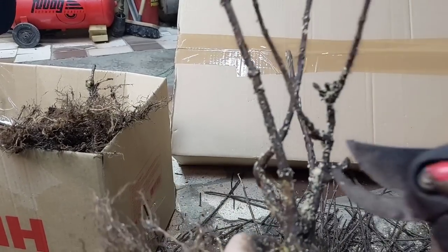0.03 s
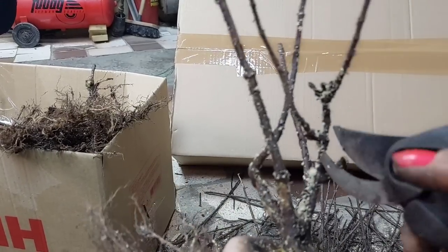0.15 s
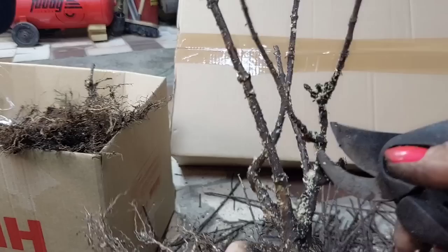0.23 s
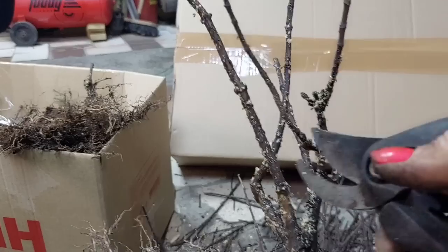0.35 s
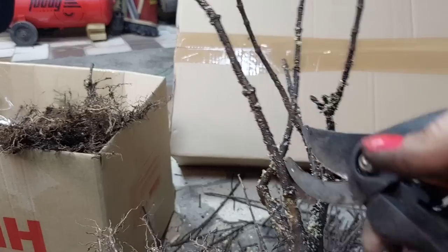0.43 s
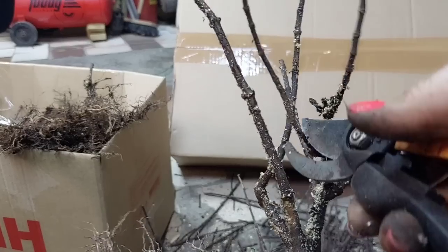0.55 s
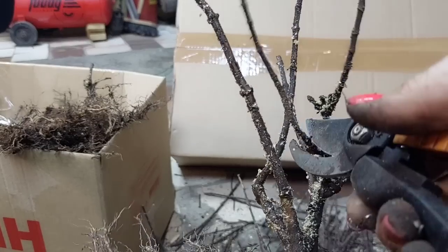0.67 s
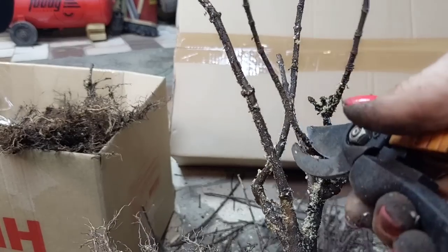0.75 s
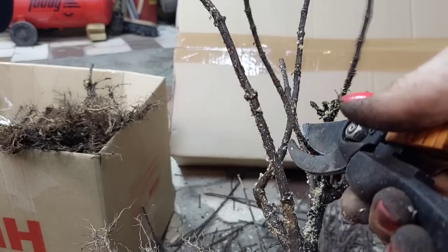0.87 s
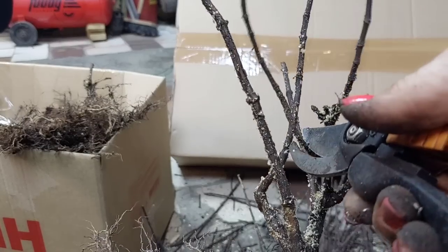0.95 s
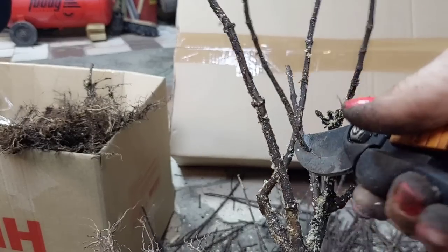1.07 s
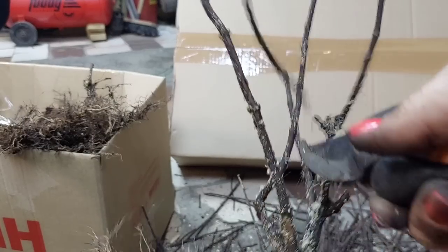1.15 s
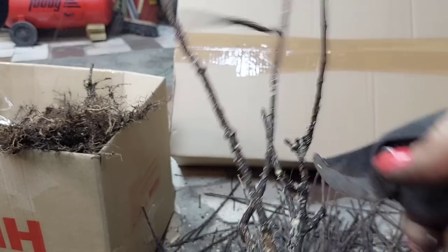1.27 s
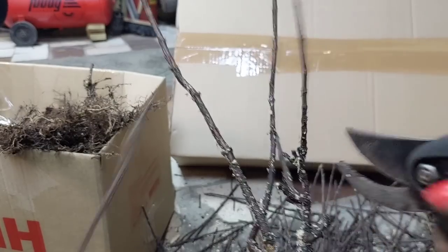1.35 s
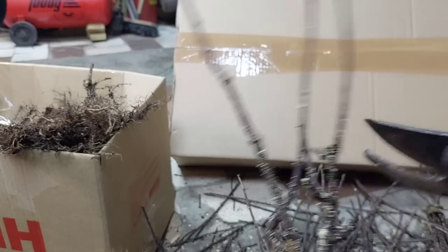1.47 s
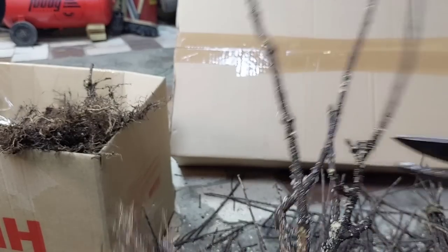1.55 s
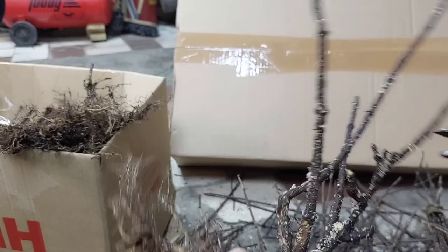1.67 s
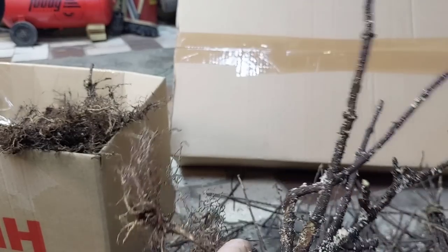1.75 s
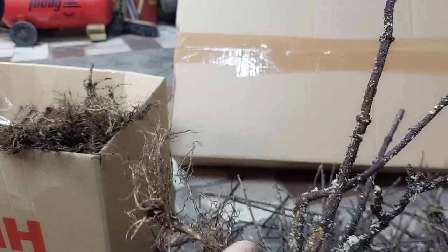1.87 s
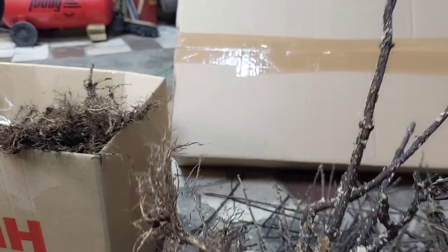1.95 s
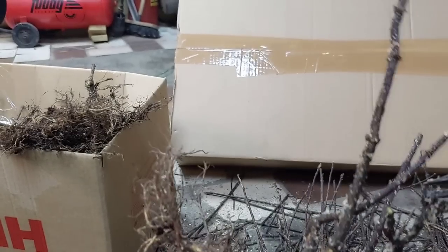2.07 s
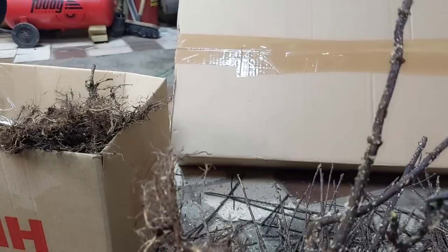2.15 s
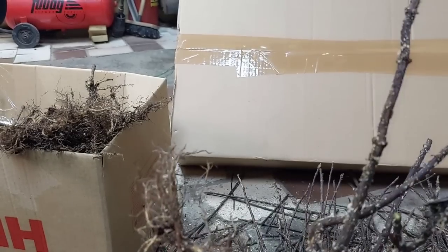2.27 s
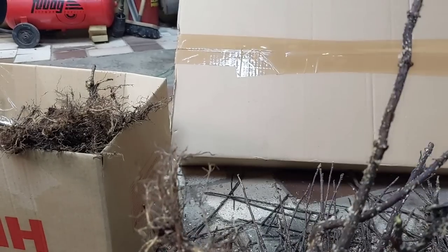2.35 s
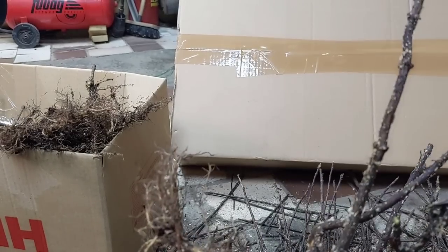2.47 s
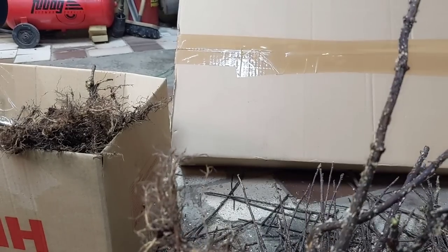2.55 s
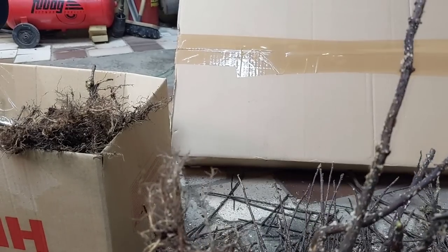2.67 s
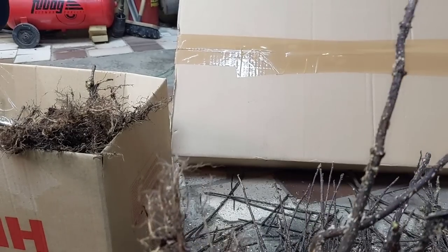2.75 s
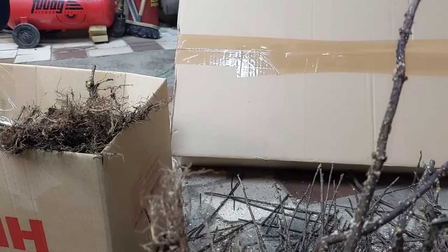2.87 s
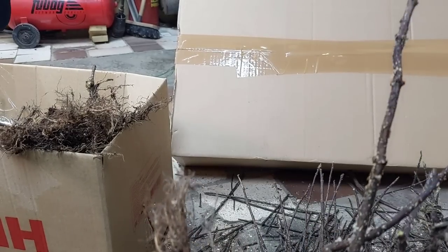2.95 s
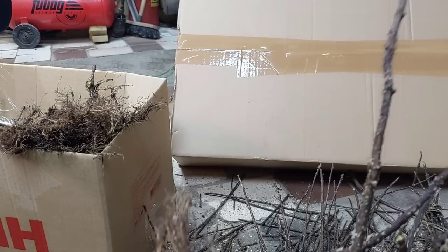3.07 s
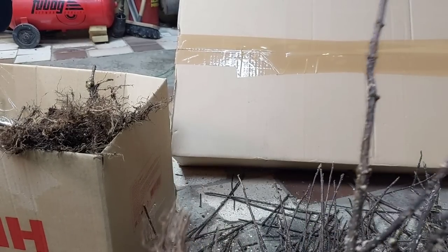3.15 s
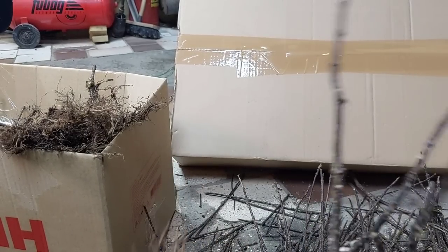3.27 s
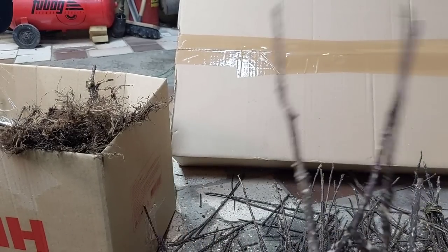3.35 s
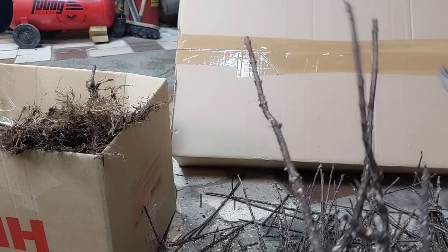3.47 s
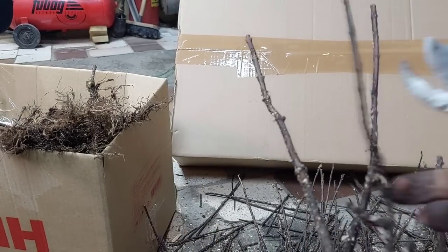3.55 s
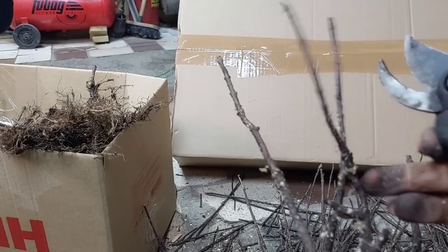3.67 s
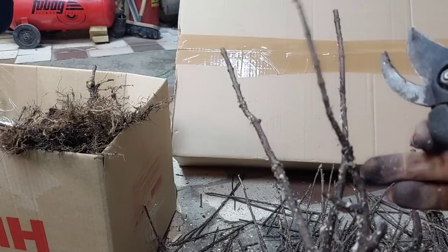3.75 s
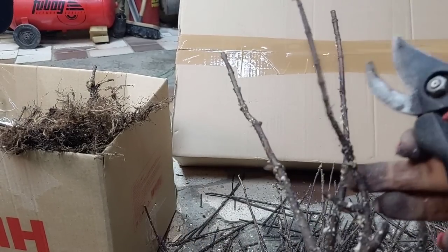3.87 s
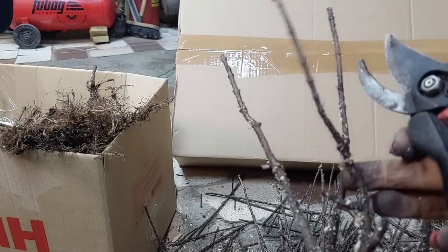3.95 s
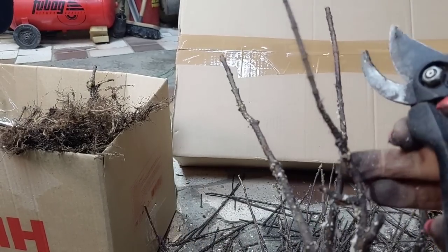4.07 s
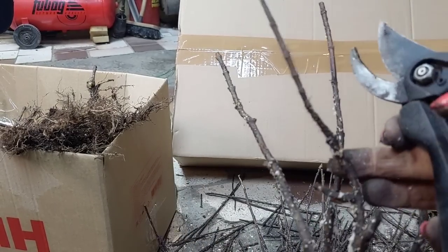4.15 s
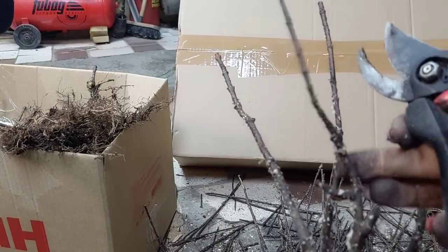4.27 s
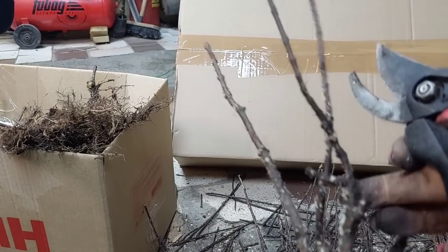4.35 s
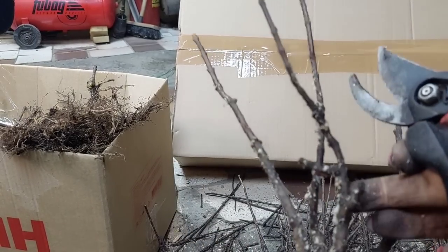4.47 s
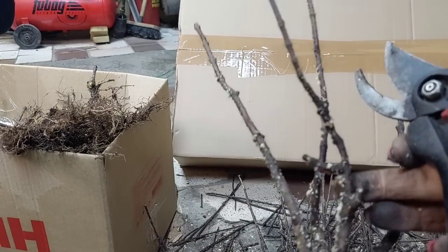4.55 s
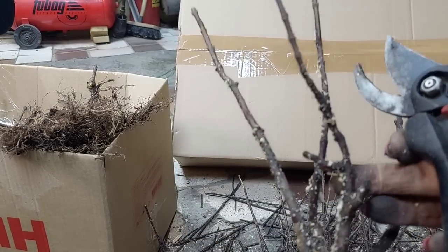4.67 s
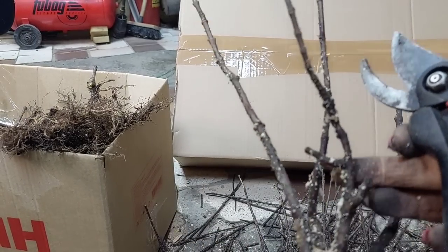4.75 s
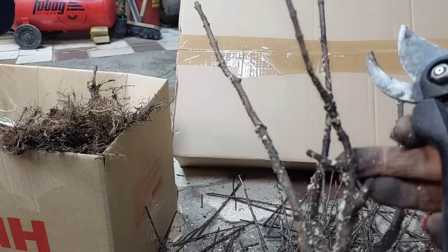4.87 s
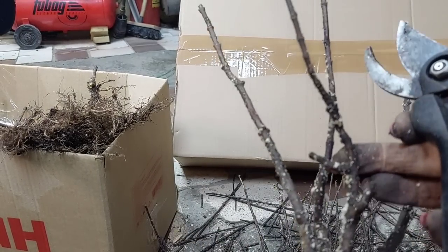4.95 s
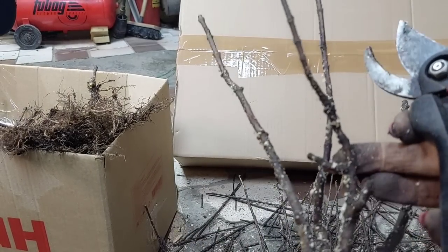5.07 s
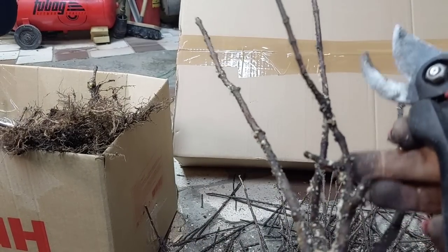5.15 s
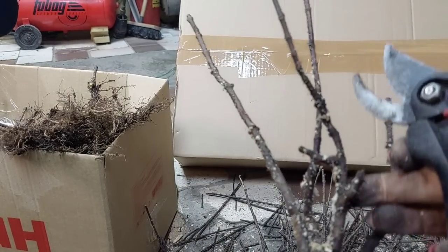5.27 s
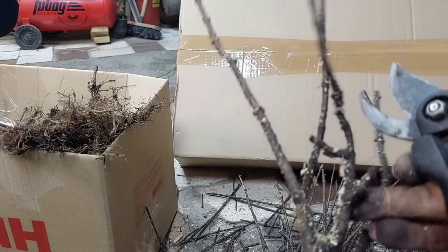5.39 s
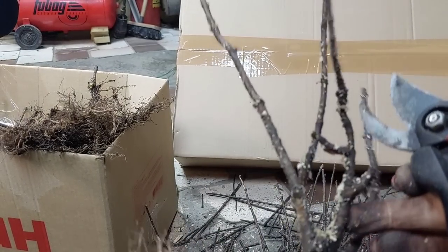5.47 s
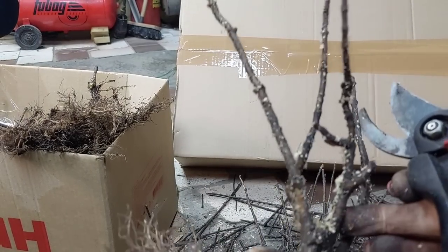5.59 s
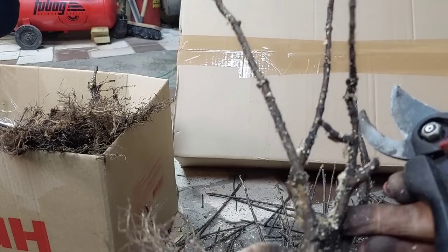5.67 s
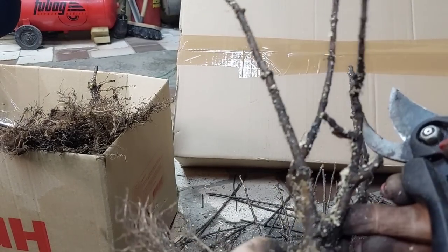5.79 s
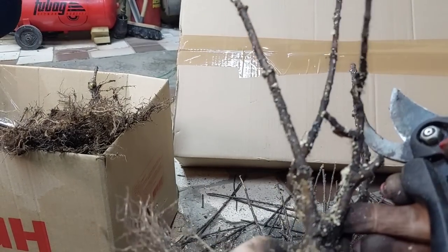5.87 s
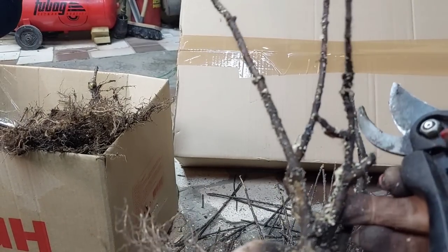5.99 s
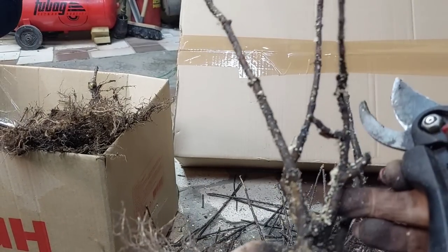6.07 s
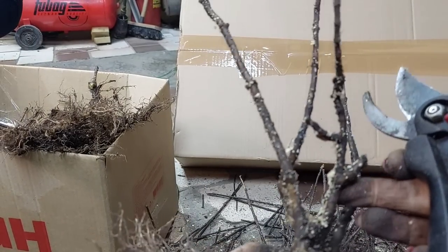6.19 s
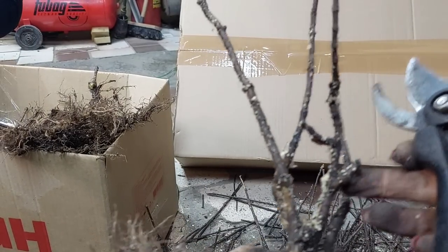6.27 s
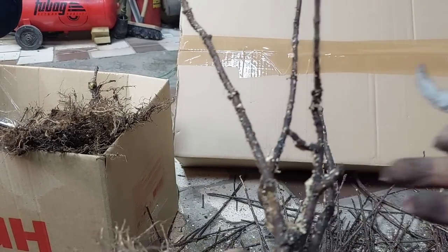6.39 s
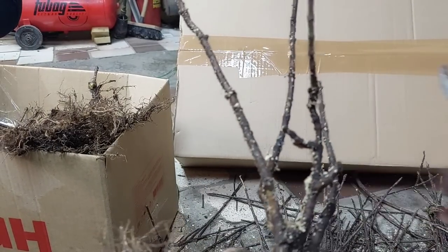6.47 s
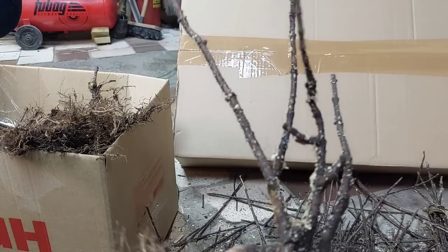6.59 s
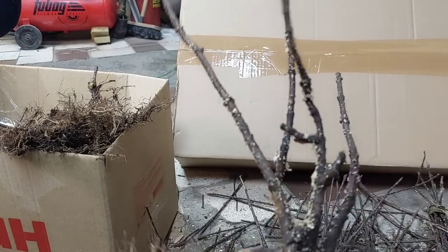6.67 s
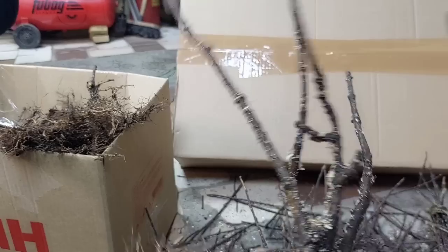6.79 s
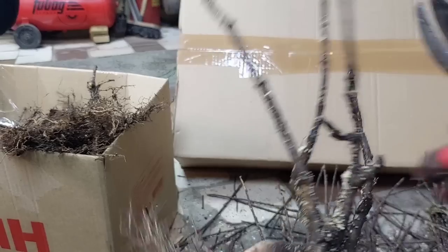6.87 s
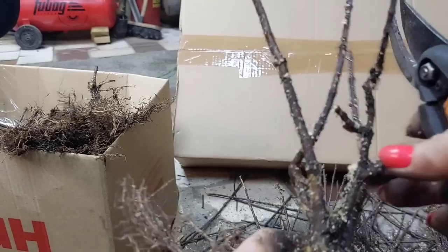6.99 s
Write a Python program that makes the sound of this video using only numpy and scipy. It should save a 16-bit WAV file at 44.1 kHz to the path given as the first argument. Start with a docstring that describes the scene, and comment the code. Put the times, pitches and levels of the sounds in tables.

```python
"""In a small workshop with a hard floor, hand pruners cut two woody stems close to the microphone.
Each cut is a few cracks of wood fibre that make the steel and the stem ring; then the jaws snap shut
and scrape open again on their spring. Twigs and a sleeve rustle faintly. Further off, something soft
and heavy bumps down and slides over the floor. Under it all is the low rumble of the building."""
import sys
import numpy as np
from scipy import signal
from scipy.fft import rfft, irfft
from scipy.io import wavfile
from scipy.ndimage import uniform_filter1d

SR = 44100
rng = np.random.default_rng(int(sys.argv[2]) if len(sys.argv) > 2 else 0)


def unload_audio(sound):
    """Save the sound as a 16-bit wav file, at the path given as the first command line argument."""
    columns = np.transpose(np.atleast_2d(sound))
    # keep every value between -1 and 1, then stretch to whole-number steps
    steps = np.round(np.clip(columns, -1, 1) * 32767)
    wavfile.write(sys.argv[1], SR, steps.astype(np.int16))


N = 309960
TIME = np.arange(N) / SR
CUTOFF_HZ = 15900


def from_db(db):
    """Turn decibels into a gain to multiply by."""
    return 10 ** (np.asarray(db) / 20)


def rms_one(x):
    """Scale a sound so its average level (rms) is 1."""
    return x / np.sqrt(np.mean(x ** 2) + 1e-20)


def energy_one(x):
    """Scale a short stereo sound to an average energy of 1 a side."""
    return x / np.sqrt(np.sum(x ** 2) / 2 + 1e-20)


def at_hz(points, hz):
    """Read between the rows of a table, giving every octave equal space."""
    row_hz, values = np.transpose(points)
    return np.interp(np.log(hz), np.log(row_hz), values)


def cut(x, hz, kind, order=2):
    """Keep the "low", "high" or "band" part of a sound; a higher order cuts more steeply."""
    return signal.sosfilt(signal.butter(order, np.clip(hz, 10, .45 * SR), kind, fs=SR, output="sos"), x)


def resonate(x, hz, width_hz):
    """Ring at one pitch; the narrower the width, the longer the ring."""
    r = np.exp(-np.pi * width_hz / SR)
    feedback = [1, -2 * r * np.cos(2 * np.pi * hz / SR), r * r]
    return signal.lfilter(np.array([1, 0, -1]) * (1 - r * r) / 2, feedback, x + 1e-18)


def panned(db):
    """Left and right gains: a pan above 0 dB is louder on the left."""
    return from_db(np.array([[db], [-db]]) / 2)


def add(out, s, x):
    """Mix a short sound in, starting at s seconds."""
    i = round(s * SR)
    out[:, i:i + x.shape[1]] += x[:, :N - i]


def swell_and_fall(t, rise_s, fall_s):
    """A gain that grows to 1 at time zero, then dies away."""
    return np.exp(np.minimum(t / rise_s, -t / fall_s))


def noise(gain_at, likeness, size=N):
    """Stereo noise; likeness runs from 0 (unrelated sides) to 1 (the same on both)."""
    hz = np.fft.rfftfreq(size, 1 / SR)[1:]
    mid, side = rng.standard_normal((2, len(hz))) + 1j * rng.standard_normal((2, len(hz)))
    alike = np.clip(at_hz(likeness, hz), -1, 1)
    both = gain_at(hz) * (np.sqrt(1 + alike) * mid + np.sqrt(1 - alike) * np.array([side, -side]))
    return irfft(np.pad(both, ((0, 0), (1, 0))), size)


# The tone of the background (frequency [Hz], level [dB])
RUMBLE_TONE = [(10, -30), (22, -14), (31, -5), (42, -10), (55, -6), (72, -1.5), (120, -9), (180, -16.5),
               (280, -17.5), (440, -27), (770, -34), (1200, -34), (2900, -42.5), (6000, -45.5), (8300, -44),
               (10600, -45.5), (14700, -45), (16000, -52)]
# How far it leans left (frequency [Hz], pan [dB])
RUMBLE_PAN = [(30, 4.5), (90, 7.5), (250, 8.5), (600, 3.5), (1500, 2.5), (3000, .5), (14000, 0)]
# How alike its two sides are (frequency [Hz], likeness [0-1])
RUMBLE_LIKENESS = [(30, 0.9), (100, 0.16), (220, .15), (600, 0), (15000, 0)]
def building_rumble(level_db=-63.5, waver_db=2.5, waver_below_hz=300):
    """The building rumbles, wavering slowly and stronger on the left, under a faint steady hiss."""
    sides = np.array([[1], [-1]]) / 2
    steady = noise(lambda hz: from_db(at_hz(RUMBLE_TONE, hz) + sides * at_hz(RUMBLE_PAN, hz)),
                   RUMBLE_LIKENESS)
    steady = rms_one(steady)
    drift = rms_one(cut(rng.standard_normal(N + SR), 3, "low")[SR:])
    bass = cut(steady, waver_below_hz, "low", order=1)
    return from_db(level_db) * (steady + (from_db(waver_db * drift) - 1) * bass)


# How alike the two sides of a sound in the room are (frequency [Hz], likeness [0-1])
SIDE_LIKENESS = [(40, 0.3986), (150, 1), (300, 0.85), (600, 0.096), (1200, 0.49), (15000, 0.81)]
def room_noise(tone=None, size=N):
    """Noise spread around the room, shaped by a tone table if one is given."""
    return rms_one(noise(lambda hz: 1 if tone is None else from_db(at_hz(tone, hz)), SIDE_LIKENESS, size))


# How long the room takes to fade by 60 dB (frequency [Hz], time [s])
TAIL_FADE = [(80, .2), (350, .28), (1200, .24), (2500, .2), (6000, .2), (15000, .17)]
# The tone of that fading sound (frequency [Hz], level [dB])
TAIL_TONE = [(80, -4), (350, -1.5), (750, 1.5), (1150, -0.5), (1620, -2), (2200, 1.5), (2800, 1.5),
             (3500, 2.5), (5000, -0.5), (8000, 1), (14000, -2)]
def room_tail(build_s=0.0056, smooth_hz=90):
    """Countless echoes blur into a short tail that builds up and dies away."""
    t, tail = TIME[:SR // 2], 0
    edges = np.geomspace(40, 18000, 12)
    for low, high in zip(edges, edges[1:]):
        band = cut(room_noise(size=len(t)), [low, high], "band")
        tail = tail + band * from_db(-60 * t / at_hz(TAIL_FADE, np.sqrt(low * high)))
    tail = tail * (1 - np.exp(-(t / build_s) ** 2))
    # Even out the spectrum so that no single pitch sticks out.
    spectrum, hz = rfft(tail, 2 * len(t)), np.fft.rfftfreq(2 * len(t), 1 / SR)
    power = uniform_filter1d(np.abs(spectrum) ** 2, round(smooth_hz / hz[1]))
    even = spectrum / np.sqrt(np.abs(power) + 1e-20)
    tone = from_db(at_hz(TAIL_TONE, hz + 1)) * (hz < CUTOFF_HZ)
    return energy_one(irfft(even * tone)[:, :len(t)])


# Echoes off nearby cardboard and the floor (delay [s], level [dB])
CLOSE_ECHOES = [(.0011, -17), (.0048, -20.5), (0.0143, -23)]
def workshop(near, around, tail_db=-14, tail_pan_db=1.5, left_lag_s=.00015):
    """The right side hears the tool first; close surfaces echo it, then the room's tail follows."""
    direct = np.array([np.roll(near[0], round(left_lag_s * SR)), near[1]])
    echoes = np.zeros((2, N))
    for delay_s, db in CLOSE_ECHOES:
        add(echoes, delay_s, from_db(db) * direct)
    tail = signal.oaconvolve(around.mean(axis=0, keepdims=True), room_tail(), axes=1)[:, :N]
    return direct + echoes + from_db(tail_db) * panned(tail_pan_db) * tail


# The slide swells and stops (time [s], rub level [dB], grit level [dB])
SLIDE_LEVELS = [(4.33, -88, -81.5), (4.38, -65.5, -70), (4.56, -61.5, -64.5), (4.73, -58, -67),
                (4.91, -50.5, -58.5), (5.12, -49, -59), (5.19, -60.5, -69.5), (5.29, -68.5, -74),
                (5.37, -77.5, -78), (5.45, -90.5, -81.5)]
# The tone of the rubbing (frequency [Hz], level [dB])
RUB_TONE = [(41, -34), (70, -12), (96, -21), (133, -2), (210, -18.5), (336, -9.5), (519, -12), (723, -10),
            (906, -14.5), (1330, -14), (2530, -17), (2810, -21), (4500, -23), (5850, -29.5), (9900, -120)]
# The tone of the grit (frequency [Hz], level [dB])
GRIT_TONE = [(2060, -23), (3500, -11), (6700, -6.5), (9260, -13.5), (11600, -9), (14600, -11.5),
             (15600, -9), (16000, -29)]
# The load catches and groans (peak time [s], level [dB], rise [s], fall [s], pitch [Hz], width [Hz])
GROANS = [(4.90, -49, 0.041, 0.041, 753, 171), (5.26, -59.5, 0.069, 0.059, 447, 396)]
def slide(rub_pan_db=3, grit_pan_db=2, judder_db=0.53, judder_hz=60, landing_s=4.465, landing_db=-49.5):
    """A soft load lands and drags over the floor: it judders, groans where it catches, and grit hisses."""
    times, rub_db, grit_db = np.transpose(SLIDE_LEVELS)
    sliding = (TIME >= times[0]) & (TIME <= times[-1])
    drag, grit = [from_db(np.interp(TIME, times, db)) * sliding for db in (rub_db, grit_db)]
    judder = from_db(judder_db * rms_one(cut(rng.standard_normal(N), judder_hz, "low")))
    rub = drag * room_noise(RUB_TONE)
    for s, db, rise_s, fall_s, hz, width_hz in GROANS:
        groan = rms_one(resonate(resonate(room_noise(), hz, width_hz), hz, width_hz))
        rub = rub + from_db(db) * swell_and_fall(TIME - s, rise_s, fall_s) * groan
    landing = from_db(landing_db) * swell_and_fall(TIME - landing_s, rise_s=.0006, fall_s=.004)
    hiss = (grit + landing) * room_noise(GRIT_TONE)
    return judder * panned(rub_pan_db) * rub + panned(grit_pan_db) * hiss


# Bumps across the room (time [s], level [dB], rise [s], bass limit [Hz], treble limit [Hz])
FAR_BUMPS = [(2.837, -58, 0.0024, 600, 7570), (3.198, -56.5, 0.015, 277.3, 1400),
             (3.574, -41.5, 0.04, 90.26, 1850), (3.79, -65, 0.088, 303, 2200),
             (4.139, -66, 0.028, 812, 4940), (4.414, -52, 0.0095, 86.1, 890),
             (4.464, -32.5, 0.0024, 131, 2980), (4.471, -28.5, 0.018, 123, 2750),
             (5.049, -46, 0.033, 87.5, 2000)]
# The notes the room booms at (pitch [Hz], width [Hz], level [dB])
BOOM_NOTES = [(132.7, 27, 9), (338.8, 39, 7.5), (576, 24, 4.5), (880, 200, -5.5), (2480, 60, -1.5)]
def bumps(pan_db=3.0, fall_s=0.048, soft_span=1.3, sharp_s=0.015):
    """Soft far-off blows, smeared by the room, swell and boom away; the quicker, the brighter."""
    out, t = np.zeros((2, N)), TIME[:SR // 2]
    for s, db, rise_s, low_hz, top_hz in FAR_BUMPS:
        dull_hz = low_hz * (soft_span + sharp_s / rise_s)
        thud = cut(cut(room_noise(size=len(t)), low_hz, "high"), dull_hz, "low")
        boom = sum(from_db(note_db) * resonate(thud, hz, width) for hz, width, note_db in BOOM_NOTES)
        body = cut(thud + boom, top_hz, "low", order=6)
        swell = np.minimum(t / rise_s, np.exp((rise_s - t) / fall_s))
        add(out, s, from_db(db) * panned(pan_db) * energy_one(body * swell) * np.linalg.norm(swell))
    return out


# Twigs and a sleeve brush past (peak time [s], level [dB], fall [s])
TOUCHES = [(.47, -80, 0.047), (.56, -79, 0.022), (.775, -83, 0.19), (.93, -79, 0.2), (1.084, -69, 0.026),
           (1.511, -73.5, 0.05), (1.566, -70, 0.019), (1.924, -85, 0.033), (3.301, -70.5, 0.057),
           (3.419, -80, 0.057), (3.591, -80.5, 0.15), (3.723, -84, 0.23), (7.02, -71.5, 0.044)]
# The tone of the rustling (frequency [Hz], level [dB])
RUSTLE_TONE = [(710, -39.5), (1200, -10), (2200, 2), (3620, -5.5), (3910, -1.5), (7170, 0), (9110, -6.5),
               (14800, -6), (16000, -16.5)]
def rustles(grain_db=4, grain_hz=310, pan_db=-1, rise_s=.018):
    """Bark and cloth brush in fine uneven grains; each touch comes quickly and dies away."""
    movement = sum(from_db(db) * swell_and_fall(TIME - s, rise_s, fall_s) for s, db, fall_s in TOUCHES)
    flicker = rms_one(cut(rng.standard_normal(N), grain_hz, "low"))
    grains = rms_one(from_db(grain_db * np.clip(flicker, -2, 2)))
    return panned(pan_db) * movement * grains * room_noise(RUSTLE_TONE)


def ring(force, notes, spread_db, tilt_db=0, centre_hz=3500):
    """A push rings an object's own notes; each reaches left and right a little differently."""
    chance_db = spread_db * rng.standard_normal((len(notes), 2, 1))
    out = 0
    for k, (hz, width, db) in enumerate(notes):
        gain = from_db(db + tilt_db * np.log2(hz / centre_hz) + chance_db[k])
        out = out + (-1) ** k * gain * resonate(force, hz, width)
    return out


# The notes of the jaws (pitch [Hz], width [Hz], level [dB])
JAW_NOTES = [(1084, 240, -4.5), (1185, 160, 0.5)]
# The pivot they turn on (pitch [Hz], width [Hz], level [dB])
PIVOT_NOTES = [(2200, 70, 2.5), (2430, 160, -7)]
# The stem clamped between them (pitch [Hz], width [Hz], level [dB])
STEM_NOTES = [(1600, 170, -1), (1800, 430, -1.5), (1983, 130, -1)]
# The blades, muffled by the wood (pitch [Hz], width [Hz], level [dB])
BLADE_NOTES = [(3180, 640, -5.5), (4300, 670, -7), (4570, 120, 1), (5010, 230, 2), (5572, 700, -10),
               (6500, 420, -7), (8420, 350, -11)]
def ring_parts(force, jaw_ratio, blade_ratio, spread_db, tilt_db=0):
    """One push rings jaws, pivot, stem and blades: four sounds. The ratios shift the steel's pitch."""
    parts = (JAW_NOTES, jaw_ratio), (PIVOT_NOTES, jaw_ratio), (STEM_NOTES, 1), (BLADE_NOTES, blade_ratio)
    return [ring(force, np.multiply(notes, [ratio, 1, 1]), spread_db, tilt_db) for notes, ratio in parts]


# The blades rub as the jaws move
# (peak time [s], level [dB], rise [s], fall [s], brightness [dB per octave], pan [dB])
BLADE_RUBS = [(1.071, -69, .008, .015, 3, 0), (1.325, -55, .010, .012, -1, -7),
              (1.341, -39.5, .006, .004, -.7, -6), (1.347, -46, .002, .002, 2, -3),
              (3.252, -52.5, .010, .012, .7, 0)]
def scrapes(grain_db=4, lowest_hz=1150, sizzle_db=-18):
    """Blade slips over blade and stem in many tiny catches that ring the parts, with a sizzle on top."""
    out, t = np.zeros((2, N)), TIME[:SR // 4] - 1 / 8
    parts_db = -2, 0, -5, -9   # jaws, pivot, stem, blades
    for s, db, rise_s, fall_s, tilt_db, pan_db in BLADE_RUBS:
        hiss = rng.standard_normal((2, 2, len(t)))
        catches, sizzle = hiss * from_db(grain_db * np.clip(rng.standard_normal(len(t)), -2, 2))
        parts = ring_parts(catches, jaw_ratio=0.95, blade_ratio=1, spread_db=2.5, tilt_db=tilt_db)
        ringing = sum(gain * part for gain, part in zip(from_db(parts_db), parts))
        steel = ringing + from_db(sizzle_db + 2 * tilt_db) * sizzle
        steel = rms_one(cut(steel, lowest_hz, "high", order=4))
        add(out, s + t[0], from_db(db) * panned(pan_db) * steel * swell_and_fall(t, rise_s, fall_s))
    return out


# The notes of the handles in the hand (pitch [Hz], width [Hz], level [dB])
HANDLE_NOTES = [(94.5, 55, 1), (244, 110, 2), (393, 110, 1), (556, 500, -14.5)]
# The range of the bare crack of wood that goes into the room (lowest [Hz], highest [Hz])
BARE_CRACK_BAND = [1100, 5900]
# Cracks of wood and jaws; each rings the steel at its own slightly different pitch
# (time [s], tearing time [s], steel pitch [ratio], pan [dB],
#  jaws [dB], pivot [dB], stem [dB], blades [dB], splinters [dB], handle knock [dB])
CUT_CRACKS = [(1.0499, .0005, 1.3, -6, -58, -60.5, -57.5, -44.5, -40.5, -61),
              (1.1351, .0006, 1.03, 0, -19, -21, -14, -16, -26.5, -27.5),
              (1.149, .0005, 1.08, -5.5, 2, 0.5, 3.5, -4.5, -14, -5),
              (1.15, .0008, 1.03, -2.5, -5.5, -5, -7.5, -5.5, -5, -10),
              (1.1521, .00042, 1.08, -2.5, 4, 2, -0.5, 4.5, -2.5, 2.5),
              (1.3462, .0012, 1.19, -7.5, -23.5, -40, -25, -43, -47, -60),
              (1.495, .0006, 1.05, -2, -58.5, -54, -55, -46, -55, -51),
              (2.9641, .0003, 1.0, 1.5, -24, -17.5, -25, -12, -5, -32.5),
              (2.967, .006, 1.0, 1, -23.5, -31.5, -32, -16.5, -18.5, -34.5),
              (3.0193, 0.0133, 1.06, 0, -17, -8.5, -20, -7, -14, -28),
              (3.0263, 0.00099, 0.99, -4.5, -14, -12, -39, 0.5, -10.5, -17.5)]
def cracks(clean_break_s=.00015, tear_low_hz=1800, splinter_low_hz=8800, lowest_hz=1020, side_share=0.85,
           spread_db=1.72, knock_lag_s=.0008, ring_to_room_db=-4, bare_to_room_db=-3.5):
    """Wood snaps and its fibres tear, ringing the parts and spitting treble; the jolt knocks the handles."""
    near, around = np.zeros((2, 2, N))   # towards the microphone, and into the room
    t = TIME[:SR // 16]
    snap = 1. * (t == 0)
    for s, tear_s, pitch, pan_db, *parts_db, splinter_db, knock_db in CUT_CRACKS:
        burst = rng.standard_normal((2, len(t))) * np.exp(-t / tear_s)
        fibres = energy_one(cut(burst, tear_low_hz, "high", order=1))
        tear = fibres[0] + side_share * np.array([fibres[1], -fibres[1]])   # each side hears its own mix
        force = snap + tear_s / clean_break_s * tear   # a longer crack is more tear than snap
        splinters = from_db(splinter_db) * energy_one(cut(fibres, [splinter_low_hz, CUTOFF_HZ], "band"))
        knock = from_db(knock_db) * energy_one(ring(snap, HANDLE_NOTES, spread_db))
        parts = ring_parts(force, pitch, pitch, spread_db)
        ringing = sum(gain * energy_one(part) for gain, part in zip(from_db(parts_db), parts))
        bare = energy_one(cut(np.array([snap, snap]), BARE_CRACK_BAND, "band", order=1))
        bare *= np.sqrt(np.sum(ringing ** 2) / 2)   # as strong as the ringing
        into_room = from_db(ring_to_room_db) * ringing + from_db(bare_to_room_db) * bare
        for out, crack in (near, ringing), (around, into_room):
            add(out, s, panned(pan_db) * (cut(crack, lowest_hz, "high", order=4) + splinters))
            add(out, s + knock_lag_s, panned(pan_db) * cut(knock, 29, "high"))
    return near, around


def scene():
    """The pruners in front, the bumps and the slide behind, over the building's rumble."""
    near, around = cracks()
    scraping = scrapes()
    pruners = workshop(near + scraping, around + scraping)
    return pruners + rustles() + bumps() + slide() + building_rumble()


def record(dry, dip_hz=8300, dip_share=0.035, peak_hz=14000, peak_gain=0.96):
    """The right microphone's opening puts a dip and a peak in the treble; both sides lose the very top."""
    right = dry[1] - dip_share * resonate(dry[1], dip_hz, width_hz=3200)
    right = right + peak_gain * resonate(right, peak_hz, width_hz=2600)
    top_cut = signal.ellip(10, .2, 80, CUTOFF_HZ, fs=SR, output="sos")
    return signal.sosfilt(top_cut, np.array([dry[0], right]))


dry = scene()
out = record(dry)
unload_audio(out)
```